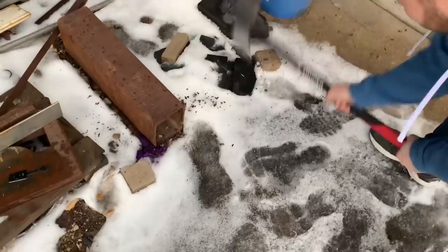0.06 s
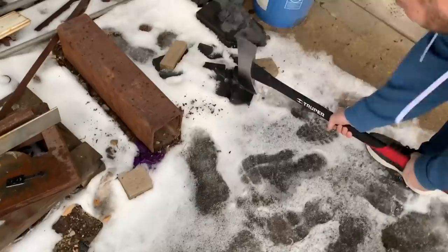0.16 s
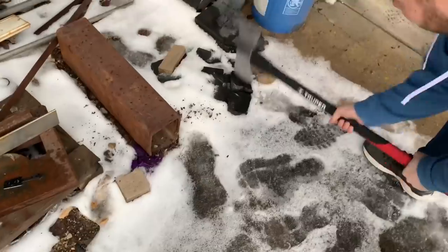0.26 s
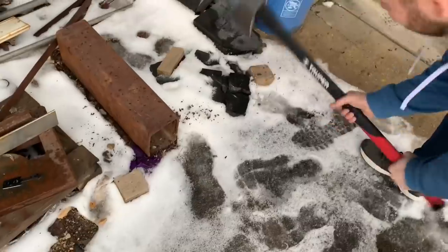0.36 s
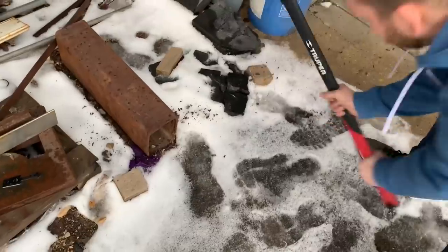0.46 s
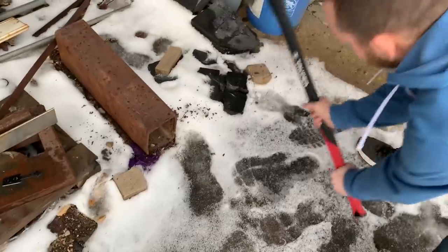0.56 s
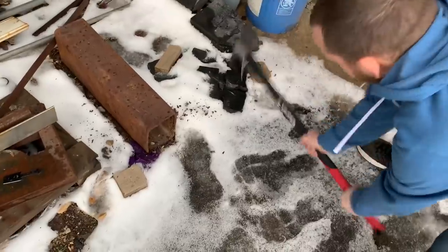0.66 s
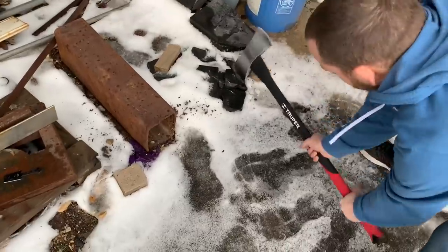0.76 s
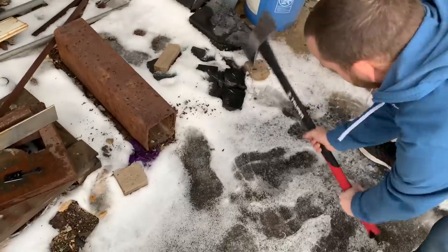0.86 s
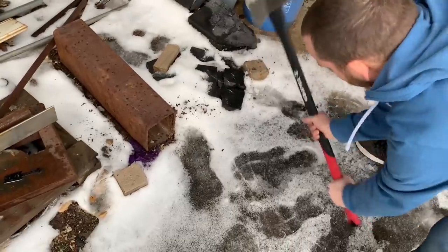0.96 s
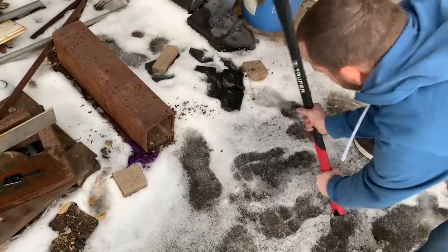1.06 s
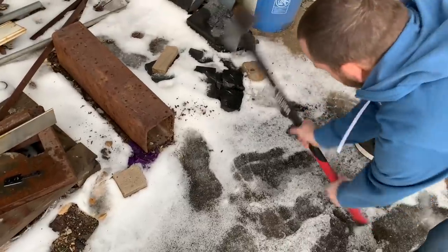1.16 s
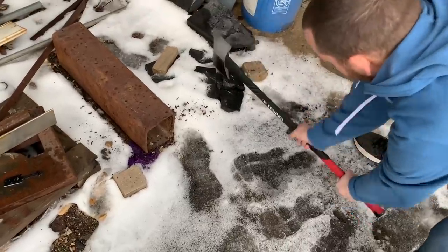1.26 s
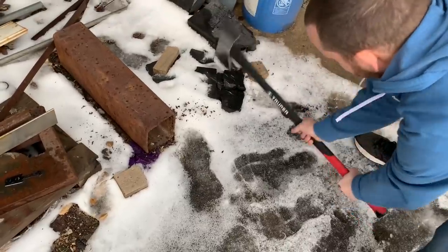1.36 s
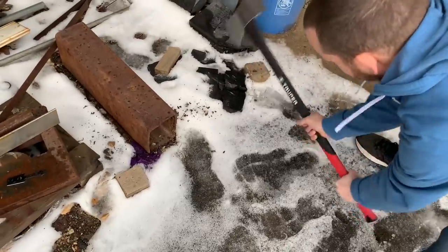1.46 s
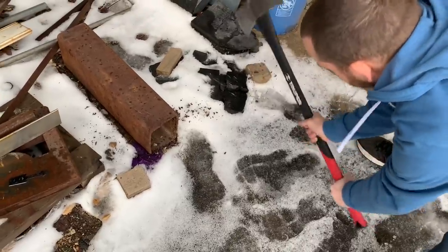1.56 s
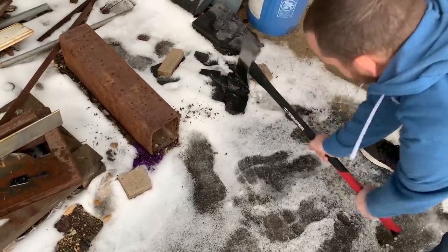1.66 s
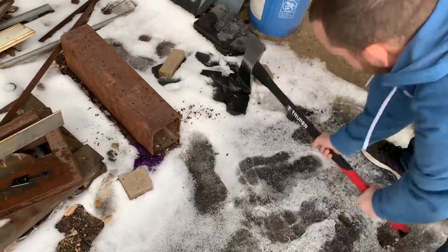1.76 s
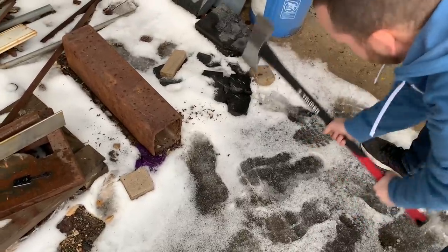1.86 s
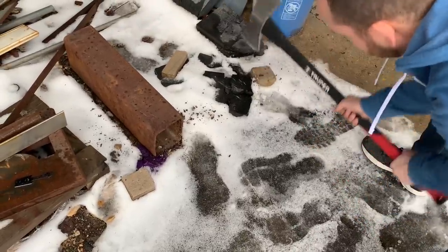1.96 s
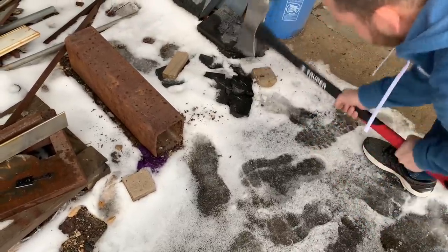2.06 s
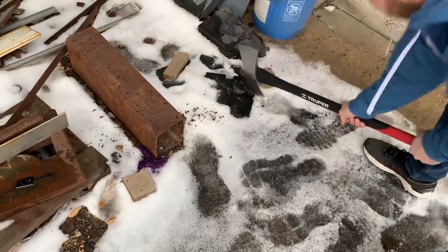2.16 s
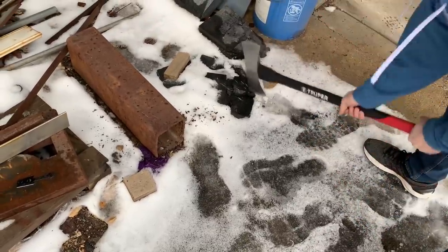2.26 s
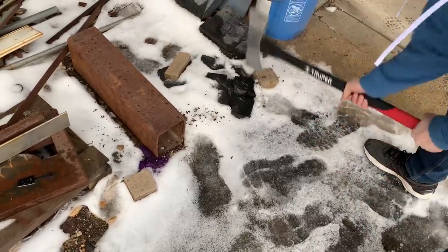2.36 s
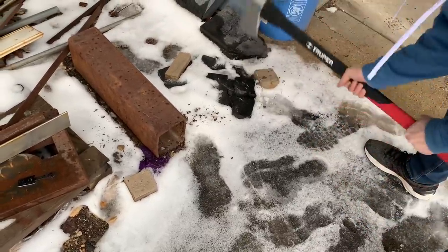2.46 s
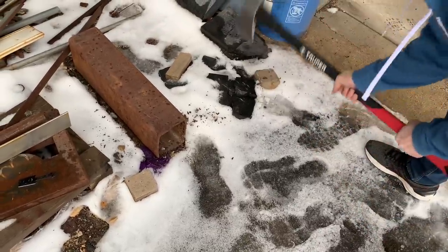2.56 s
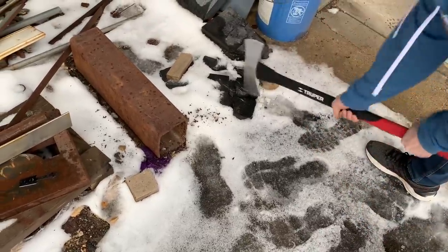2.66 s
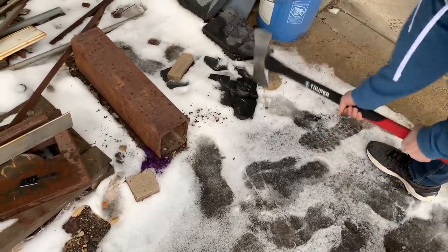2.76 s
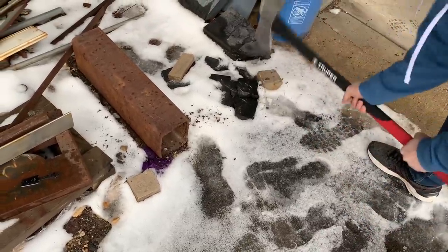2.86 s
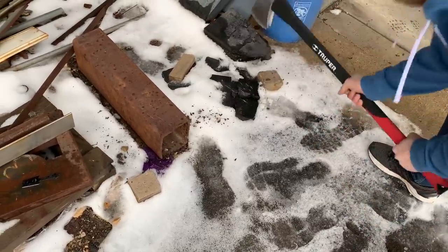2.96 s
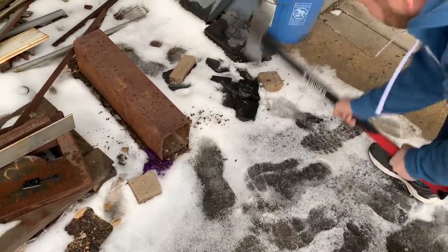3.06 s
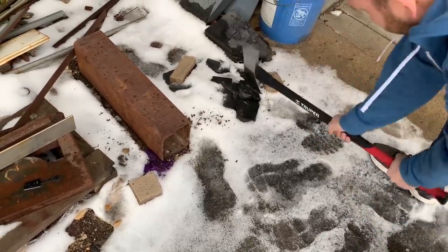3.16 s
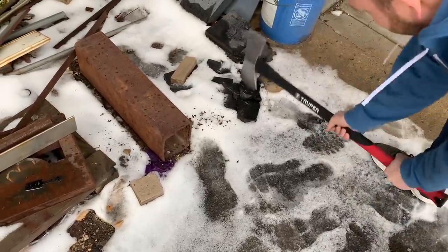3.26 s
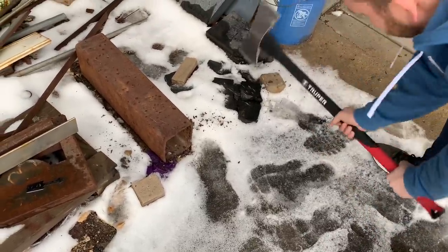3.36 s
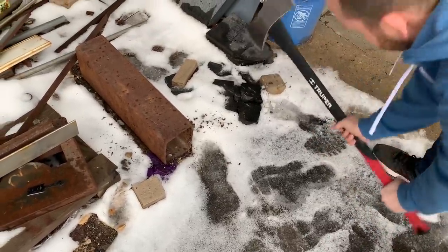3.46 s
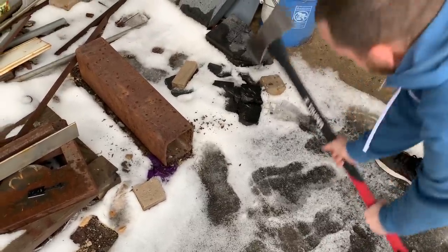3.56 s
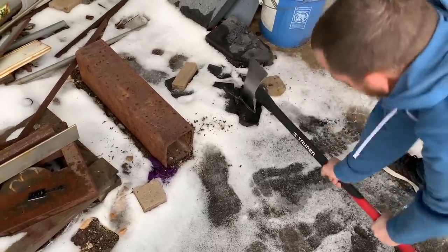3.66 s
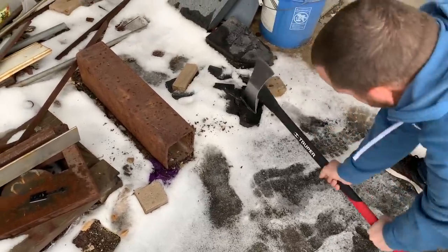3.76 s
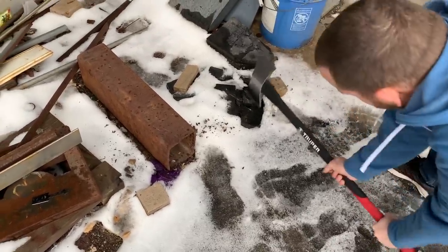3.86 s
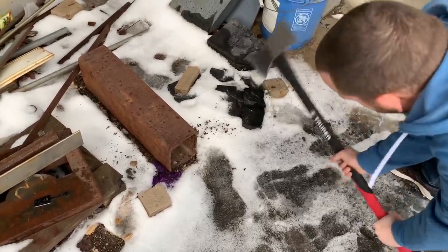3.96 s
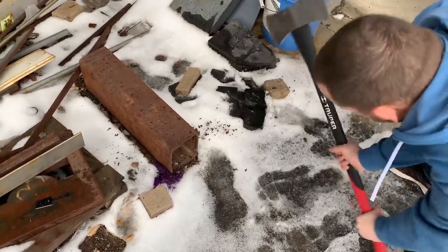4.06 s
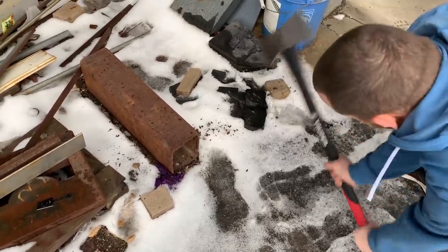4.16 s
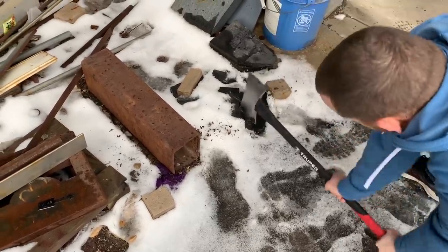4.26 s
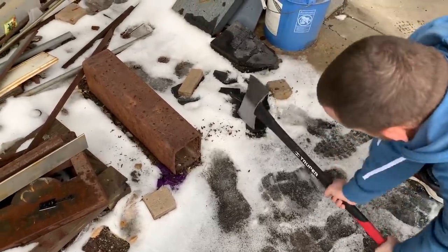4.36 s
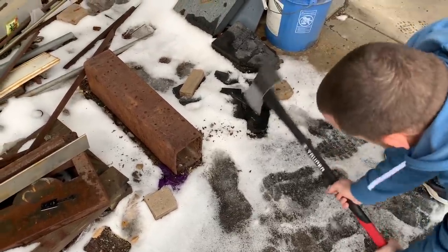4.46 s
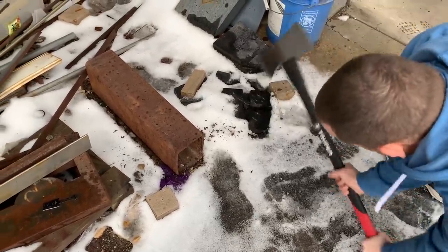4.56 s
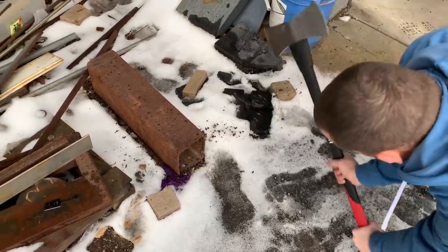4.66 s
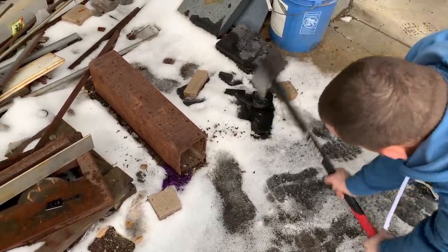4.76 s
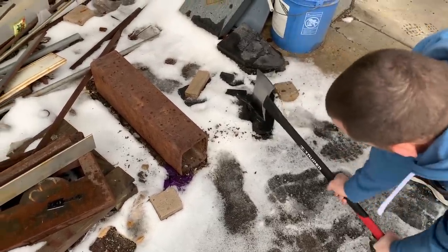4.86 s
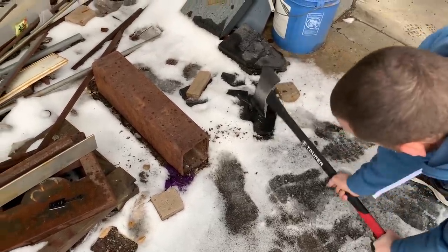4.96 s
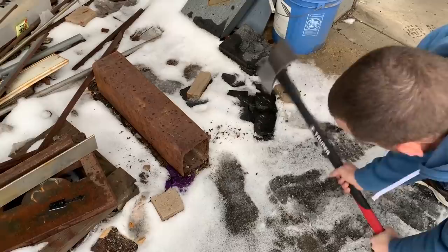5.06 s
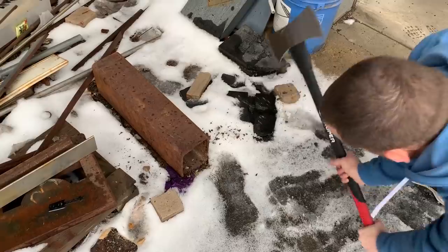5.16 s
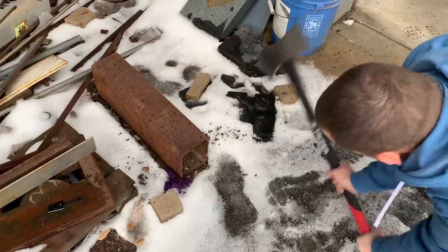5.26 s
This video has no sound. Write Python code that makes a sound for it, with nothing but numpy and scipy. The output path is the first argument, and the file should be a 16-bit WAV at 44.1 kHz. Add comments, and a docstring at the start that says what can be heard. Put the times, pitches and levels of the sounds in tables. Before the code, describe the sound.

Ten quick axe blows crack against stone outdoors, each with a thud, scattered crumbs and a brief dense yard echo over low rumble.

```python
"""Over a low outdoor rumble (coloured noise), sleeves and boots scuff (grainy noise strokes) now and then in
a snowy yard. A steel axe meanwhile chops ten times onto a rock: a noise swell leads into each crack of
crushed stone (impact plus grains), with a thud and a short ring of the head (decaying sines).
The walls answer with a dense echo (decaying noise), during which crumbs patter (resonant ticks);
a few chip ticks (resonant noise bursts) sound near the start and before the ninth blow."""
import sys
import numpy as np
from scipy import signal
from scipy.fft import rfft, irfft, next_fast_len
from scipy.io import wavfile

SR = 44100
rng = np.random.default_rng(int(sys.argv[2]) if len(sys.argv) > 2 else 0)


def unload_audio(sound):
    """Save the sound as a 16-bit wav file, at the path given as the first command line argument."""
    columns = np.transpose(np.atleast_2d(sound))
    # keep every value between -1 and 1, then stretch to whole-number steps
    steps = np.round(np.clip(columns, -1, 1) * 32767)
    wavfile.write(sys.argv[1], SR, steps.astype(np.int16))


N = 234198

# outdoor background spectrum, relative: hz, density_db_per_hz
AIR_SPECTRUM = [(20, 2.5), (50, 3), (95, 1.5), (160, -8.5), (280, -18), (500, -18), (1000, -19.5),
                (2000, -29.5), (4000, -34.5), (8000, -47.5), (15000, -60)]
# two microphones: hz, likeness (correlation, held within +-0.99), left_minus_right_db
MIC_PAIR = [(60, 0.94, -0.5), (200.6, 1, -4.5), (494, 0.36, 2), (1100, 0.38, 3), (2450, 0.12, 2),
            (5000, 0.017, 0.5), (12000, 0.033, -0.5)]
# strokes of sleeves and boots: start_s, length_s, level_db (before colour), crunch_db
SCUFF_STROKES = [(0.126, .018, -38, 3.5), (0.368, .09, -56, 4.5), (1.103, 0.014, -35.5, 4),
                 (1.18, 0.038, -38.5, -1.5), (4.2, 0.052, -38.5, 6.5), (4.513, 0.14, -63.5, -16),
                 (4.676, 0.046, -44.5, 1), (4.789, .05, -45.5, -3.5), (5.299, 0.008, -40, -11)]
# scuff colour before tilt: hz, level_db
SCUFF_SPECTRUM = [(200, -9.5), (700, -5.5), (1600, 4), (3200, 3), (5000, 4), (7500, 2.5), (10000, 9.5),
                  (11800, -10), (14000, 12), (16000, -22)]
# blows: start_s, strength_db, knock_db (high square, low glancing), brightness_db_per_octave,
# stone_hz (resonance of the struck spot), stone_db (its lift), head_db (ring of the head)
AXE_BLOWS = [(0.1765, 0.6, -4, 1, 1560, 7, -13.5), (0.7575, -3, -4.5, 2.5, 1900, 14.5, 2),
             (1.2871, 0.5, 0.5, 1.5, 1100, 4.5, -7), (1.7442, 0.1, -1.5, 1, 1830, 8, -6),
             (2.2169, 0.95, -0.6, -1.3, 2120, 4, -24.5), (2.726, 0.5, 3, -3, 1150, 6, -16),
             (3.1929, 2, 2, 0.3, 4120, 5, -23), (3.7311, 0, 3.5, -2.5, 7200, 3, -16.5),
             (4.329, -1.6, -6.5, 2.5, 5820, 5.5, 0), (4.8881, -2.5, 0.3, 3, 3540, 2.5, -17)]
# swell leading into the crack: hz, level_db
SWELL_SPECTRUM = [(60, 3), (250, 30), (600, 33), (1200, 21.5), (2200, 34), (3500, 30.5), (6500, 25.5),
                  (8000, 17.5), (9000, -6.5), (15000, -20)]
# crack of steel on stone: hz, level_db
CRACK_SPECTRUM = [(40, -4.5), (120, -4.5), (290, 15), (390, 12.5), (560, 19.5), (1100, 22.5), (1900, 18.5),
                  (3000, 24.5), (4500, 11), (6200, 15), (7500, 8.5), (10000, 13), (12000, -14.5),
                  (15000, 2.5)]
# rock and ground modes: pitch_hz, level_db, t60_s
THUD_MODES = [(93.2, -27.5, 0.37), (254.2, -18, 0.14), (533.5, -18, 0.092), (599, -19, 0.045),
              (1108, -13, 0.011)]
# axe head modes, before each blow's ring level: pitch_hz, level_db, t60_s
HEAD_MODES = [(2440, -22, 0.019), (2527, -34.5, 0.14), (2631, -25.5, 0.099), (2777, -23.5, 0.06),
              (2920, -25, 0.066), (4670, -35, 0.24), (5130, -24, 0.015), (5700, -33.5, .05),
              (6240, -15.5, 0.022), (6480, -23.5, .07), (6750, -40, 0.086), (8900, -30, .08),
              (9250, -33.5, 0.08), (10620, -30, 0.13)]
# standing waves between the walls: pitch_hz, level_db, t60_s
STANDING_WAVES = [(94.6, -40.5, 1), (149, -35.5, 0.74), (184.3, -32, 0.38), (216.1, -37, 0.92),
                  (267, -36.5, 0.27), (296.2, -39, 0.33), (446.7, -34, 0.6), (475, -32, 0.079),
                  (651.4, -23.5, 0.28), (805, -34, 0.18), (1020, -48, 0.25), (1100, -36, 0.42)]
# diffuse yard echo: hz, level_db, t60_s
YARD_ECHO = [(40, 16, .9), (100, 19.5, .8), (280, 25, 0.82), (412, 21.5, 0.58), (540, 22.5, 0.26),
             (1100, 19, 0.6), (2180, 13.5, 0.48), (3120, 17.5, 0.8), (3700, 13, 0.2), (6200, 7, 0.48),
             (6900, 2, .5), (10300, 8.5, .44), (11660, -21, .4), (13030, 6, 0.36), (15500, -13, 0.25)]
# first wall echoes, before yard colour: delay_s, level_db
WALL_ECHOES = [(0.019, -5.5), (0.0254, -7), (.0272, -11.5)]
# small ticks and chips: start_s, level_db, centre_hz
CHIP_TICKS = [(0.341, -22, 8900), (.370, -12, 2440), (0.39, -10.5, 1640), (0.4, -12.5, 2440),
              (.515, -18.5, 1880), (.669, -13, 1277), (4.03, -29.5, 10000), (4.156, -32, 6000)]

TAIL_S = np.arange(32768) / SR   # time axes
BRIEF_S = TAIL_S[:1024]
AIR_RMS_DB = -43
SCUFF_ATTACK_S, SCUFF_RELEASE_S = 0.018, 0.02
SCUFF_TILT_DB_PER_OCTAVE, TILT_LOSS_PER_CRUNCH_DB = -0.62, 0.25
SWELL_DB = -14.5   # beside its blow
CRUSH_DECAY_S, CRUSH_SHARE = 0.002, 0.48   # crumbling stone: decay, amplitude beside the impact
KNOCK_HZ, KNOCK_WIDTH_OCTAVES = 750, 0.71   # centre and Gaussian sigma
BRIGHT_FROM_HZ = 2650
EDGE_DB, EDGE_DB_PER_HEAD_DB = -2.5, 0.24   # edge ring: base level, share of head_db
CUTOFF_HZ = 15500


def from_db(db):
    """Decibels to gain."""
    return 10 ** (np.asarray(db) / 20)


def unit_energy(x):
    """Scale each channel to an energy of one."""
    return x / np.sqrt(np.sum(x ** 2, axis=-1, keepdims=True) + 1e-20)


def at_hz(table, hz, column=1):
    """Interpolate one table column on a log-frequency axis."""
    table = np.array(table)
    return np.interp(np.log(np.maximum(hz, 1)), np.log(table[:, 0]), table[:, column])


def colour(x, spectrum):
    """Causal minimum-phase filter with the given (hz, level_db) shape, built by folding the cepstrum."""
    size = 4096
    hz = np.fft.rfftfreq(size, 1 / SR)
    cepstrum = irfft(np.log(from_db(at_hz(spectrum, hz))))
    cepstrum[1:size // 2] *= 2
    cepstrum[size // 2 + 1:] = 0
    response = irfft(np.exp(rfft(cepstrum)))[None, :size // 2]
    return signal.oaconvolve(np.atleast_2d(x), response, axes=1)


def resonate(x, hz, q):
    """Pass only a narrow resonance."""
    b, a = signal.iirpeak(hz, q, fs=SR)
    return signal.lfilter(b, a, x)


def add(track, start_s, sound):
    """Mix a sound into a track from start_s on."""
    start = max(round(start_s * SR), 0)
    part = track[..., start:start + sound.shape[-1]]
    part += sound[..., :part.shape[-1]]


def stereo_noise(size):
    """White noise, alike at both microphones in the bass and nearly unrelated in the treble."""
    hz = np.fft.rfftfreq(size, 1 / SR)
    alike = np.clip(at_hz(MIC_PAIR, hz), -0.99, 0.99)
    sides = np.array([[1], [-1]])
    mid, side = rfft(rng.standard_normal((2, size)))
    pan = from_db(sides * at_hz(MIC_PAIR, hz, column=2) / 2)
    pair = np.sqrt((1 + alike) / 2) * mid + sides * np.sqrt((1 - alike) / 2) * side
    return irfft(pan * pair, size)


def burst(decay_s):
    """A brief puff of stereo noise with exponential decay."""
    return unit_energy(stereo_noise(len(BRIEF_S)) * np.exp(-BRIEF_S / decay_s))


def ring(modes):
    """One decaying sine per mode, signs alternating."""
    sines = []
    for k, (hz, db, t60_s) in enumerate(modes):
        envelope = from_db(db - 60 * TAIL_S / t60_s)
        sines.append((-1) ** k * envelope * np.sin(2 * np.pi * hz * TAIL_S))
    return np.array(sines)


def background():
    """Steady outdoor rumble with a faint hiss: coloured noise."""
    run_in = len(BRIEF_S)   # skip the filter's onset
    noise = colour(stereo_noise(next_fast_len(N + run_in, True)), AIR_SPECTRUM)
    noise = noise[:, run_in:run_in + N]
    return from_db(AIR_RMS_DB) * noise / noise.std()


def scuffs(grain_db=2.1, grain_samples=110, crunch_hz=1700, crunch_q=1.9):
    """Grainy friction strokes; packed snow crunches in the middle range and dulls the top."""
    out = np.zeros((2, N))
    t = TAIL_S[:8192]
    for start_s, length_s, db, crunch_db in SCUFF_STROKES:
        attack = np.minimum(t / SCUFF_ATTACK_S, 1)
        release = np.exp(-np.maximum(t - length_s, 0) / SCUFF_RELEASE_S)
        steps = rng.standard_normal(len(t) // grain_samples + 1)
        grains = from_db(grain_db * np.repeat(steps, grain_samples)[:len(t)])
        noise = stereo_noise(len(t)) * grains
        noise = noise / noise.std()
        noise = noise + (from_db(crunch_db) - 1) * resonate(noise, crunch_hz, crunch_q)
        tilt = SCUFF_TILT_DB_PER_OCTAVE - TILT_LOSS_PER_CRUNCH_DB * crunch_db
        shape = [(hz, level_db + tilt * np.log2(hz / 4000)) for hz, level_db in SCUFF_SPECTRUM]
        add(out, start_s, from_db(db) * colour(attack * release * noise, shape))
    return out


def swell(decay_s=0.0045, left_db=-9, right_db=1):
    """A time-reversed noise burst rushes into the crack, mostly on the right."""
    fade_in = np.minimum(2 * BRIEF_S / BRIEF_S[-1], 1)
    rush = burst(decay_s)[:, ::-1] * fade_in
    return colour(rush, SWELL_SPECTRUM) * from_db([[left_db], [right_db]])


def blow_tone(knock_db, brightness_db_per_octave):
    """Contact spectrum: a square blow fills the low middle range, a hard one the treble."""
    hz = np.geomspace(100, 16000, 30)
    knock = np.exp(-0.5 * (np.log2(hz / KNOCK_HZ) / KNOCK_WIDTH_OCTAVES) ** 2)
    octaves_above = np.maximum(np.log2(hz / BRIGHT_FROM_HZ), 0)
    return np.c_[hz, knock_db * knock + brightness_db_per_octave * octaves_above]


def contact(tone, stone_hz, stone_db, stone_q=4.2, grain_low_cut_hz=2000, step_share=0.3):
    """A sharp impact and a burst of crushed grains, coloured by the spot of stone that is hit."""
    grains = unit_energy(rng.standard_normal(len(BRIEF_S)) * np.exp(-BRIEF_S / CRUSH_DECAY_S))
    high_pass = signal.butter(2, grain_low_cut_hz, "high", fs=SR, output="sos")
    grains = signal.sosfilt(high_pass, grains)
    force = unit_energy((BRIEF_S == 0) + CRUSH_SHARE * grains)
    for lag in rng.integers(5, 24, size=2):
        # stone gives way in quick steps: an allpass spreads the force without colouring it
        steps = np.r_[1, np.zeros(lag), step_share]
        force = signal.lfilter(steps[::-1], steps, force)
    force = force + (from_db(stone_db) - 1) * resonate(force, stone_hz, stone_q)
    return colour(force, tone)


def axe(yard, ring_echo_db=-10, ring_direct_db=-2, scatter_db=2, scatter_decay_s=0.0015, edge_from_hz=4000):
    """Contact force drives the crack, thud and standing waves; head and edge ring, and the yard echoes."""
    direct, radiated = np.zeros((2, N)), np.zeros((1, N))
    thud = ring(THUD_MODES).sum(axis=0) * from_db([[0.5], [-0.5]])   # left, right
    body = thud + ring(STANDING_WAVES).sum(axis=0) * from_db([[1], [-2]])
    head_modes = ring(HEAD_MODES)
    is_edge = np.array(HEAD_MODES)[:, 0] > edge_from_hz
    for start_s, db, knock_db, brightness, stone_hz, stone_db, head_db in AXE_BLOWS:
        force = from_db(db) * contact(blow_tone(knock_db, brightness), stone_hz, stone_db)
        edge_db = EDGE_DB + EDGE_DB_PER_HEAD_DB * head_db
        mode_db = np.where(is_edge, edge_db, head_db) + rng.normal(0, 1, len(HEAD_MODES))
        head = np.sum(from_db(mode_db)[:, None] * head_modes, axis=0)
        # ground and clutter next to the rock spread the crack over a few milliseconds
        scatter = unit_energy((BRIEF_S == 0) + from_db(scatter_db) * burst(scatter_decay_s))
        crack = colour(scatter, CRACK_SPECTRUM)
        add(direct, start_s - BRIEF_S[-1], from_db(db + SWELL_DB) * swell())
        add(direct, start_s, signal.fftconvolve(force, crack, axes=1))
        add(direct, start_s, signal.fftconvolve(force, body, axes=1))
        add(direct, start_s, from_db(ring_direct_db) * head)
        add(radiated, start_s, force)
        add(radiated, start_s, from_db(ring_echo_db) * head)
    return direct + signal.fftconvolve(radiated, yard, axes=1)[:, :N]


def yard_response(gap_s=0.019, build_s=0.0017, gap_db=-10, early_db=4.5, early_decay_s=0.09):
    """After a quieter gap the first walls answer, then scattered echoes die away band by band."""
    noise = rfft(stereo_noise(len(TAIL_S)))
    hz = np.fft.rfftfreq(len(TAIL_S), 1 / SR)
    centres_hz = np.geomspace(60, 15000, 7)
    tail = 0
    for centre_hz, weights in zip(centres_hz, np.eye(len(centres_hz))):
        band = irfft(noise * at_hz(np.c_[centres_hz, weights], hz))
        t60_s = at_hz(YARD_ECHO, centre_hz, column=2)
        tail = tail + band * unit_energy(from_db(-60 * TAIL_S / t60_s))
    arrived = np.clip((TAIL_S - gap_s) / build_s, 0, 1)
    early = np.exp(-np.maximum(TAIL_S - 2 * gap_s, 0) / early_decay_s)
    tail = tail * from_db(gap_db * (1 - arrived) + early_db * early)
    for delay_s, db in WALL_ECHOES:   # cluttered walls smear each echo a little
        add(tail, delay_s, from_db(db) * burst(0.0022))
    return colour(tail, YARD_ECHO)


def grit(count=7, level_db=-16, first_s=0.048, last_s=0.1, fade_db_per_s=-75,
         low_hz=2200, high_hz=8000, crumb_q=7):
    """Each blow throws up crumbs, resonant noise ticks; later landings tend to be weaker."""
    out = np.zeros((2, N))
    for blow in AXE_BLOWS:
        for when, pitch, strength in rng.random((count, 3)):
            flight_s = first_s + when * (last_s - first_s)
            crumb_hz = low_hz * (high_hz / low_hz) ** pitch
            crumb = unit_energy(resonate(burst(0.0005), crumb_hz, crumb_q))
            gain = strength * from_db(level_db + fade_db_per_s * (flight_s - first_s))
            add(out, blow[0] + flight_s, gain * crumb)
    return out


def chips(contact_decay_s=0.0021, skirt_db_per_octave=-12, ring_db=9, q_per_hz=0.017 / np.pi):
    """Tiny dry contacts: noise bursts, each with a short resonant clink at its own pitch."""
    out = np.zeros((2, N))
    for start_s, db, hz in CHIP_TICKS:
        shape = [(hz * 2.0 ** octave, skirt_db_per_octave * abs(octave)) for octave in range(-2, 3)]
        tick = colour(burst(contact_decay_s), shape)
        tick = tick + from_db(ring_db) * resonate(tick, hz, hz * q_per_hz)
        add(out, start_s, from_db(db) * unit_energy(tick))
    return out


def scene(small_echo_db=-23):
    """Blows and small noises share the same yard echo."""
    yard = yard_response()
    small = scuffs() + grit() + chips()
    small_echo = from_db(small_echo_db) * signal.fftconvolve(small, yard, axes=1)[:, :N]
    return background() + axe(yard) + small + small_echo


def record(dry, ceiling=0.71, low_cut_hz=28):
    """The deepest bass is lost, the loudest peaks are rounded off and the top is cut."""
    high_pass = signal.butter(2, low_cut_hz, "high", fs=SR, output="sos")
    x = signal.sosfilt(high_pass, dry)
    rounded = ceiling * np.tanh(x / ceiling)
    low_pass = signal.ellip(10, 0.3, 80, CUTOFF_HZ, fs=SR, output="sos")
    return signal.sosfilt(low_pass, rounded)


dry = scene()
out = record(dry)
unload_audio(out)
```